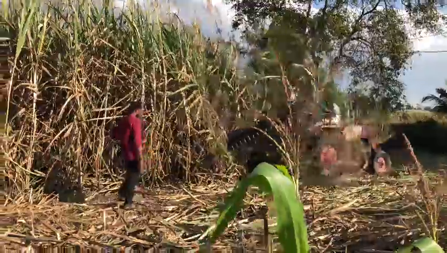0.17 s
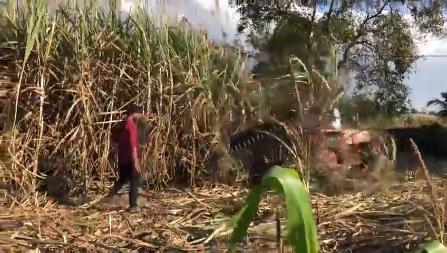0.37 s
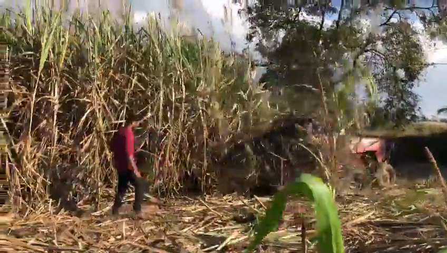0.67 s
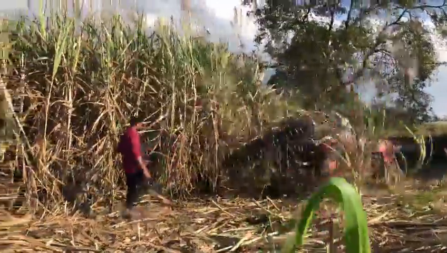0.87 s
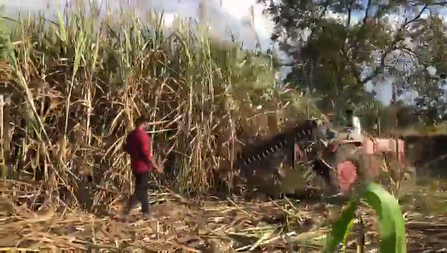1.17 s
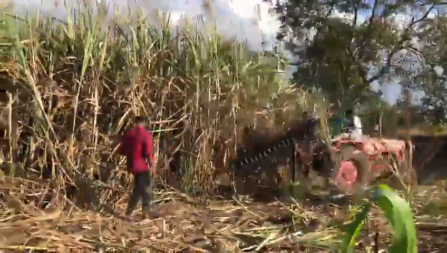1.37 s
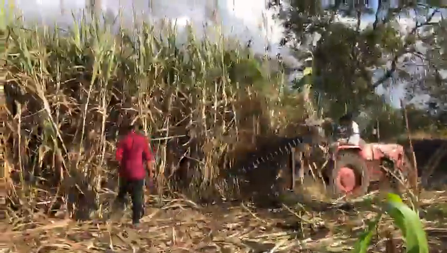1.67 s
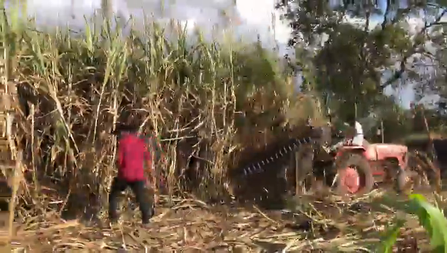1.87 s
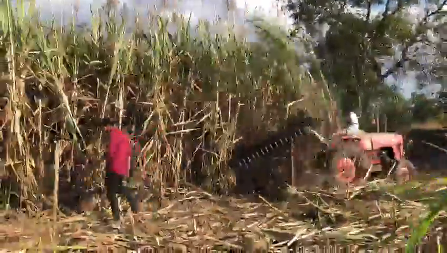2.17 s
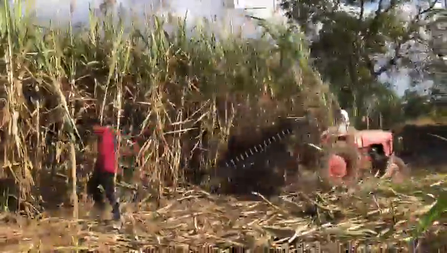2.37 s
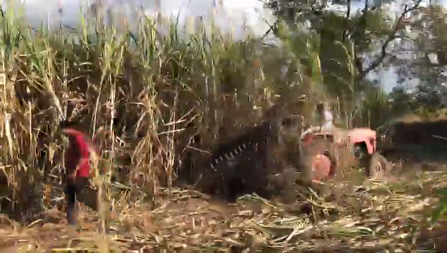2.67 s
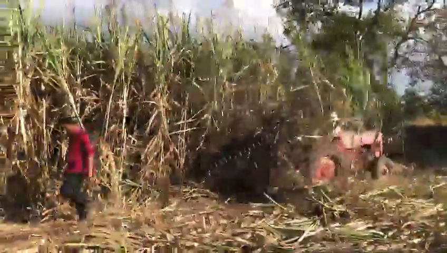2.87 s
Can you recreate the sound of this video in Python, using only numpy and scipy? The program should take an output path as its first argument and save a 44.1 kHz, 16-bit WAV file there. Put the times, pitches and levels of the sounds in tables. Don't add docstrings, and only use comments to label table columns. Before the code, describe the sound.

A diesel tractor and cane harvester roar steadily with fast metallic knocking and dry leaf rustle

```python
import sys
import numpy as np
from scipy import signal
from scipy.io import wavfile
from scipy.ndimage import uniform_filter1d

SR = 44100
rng = np.random.default_rng(int(sys.argv[2]) if len(sys.argv) > 2 else 0)


def persist_wave(psi):
    counts = np.round(np.clip(psi, -1, 1) * 32767).astype(np.int16)
    wavfile.write(sys.argv[1], SR, np.atleast_2d(counts).T)


def to_linear_factor(level_db):
    exponent = np.asarray(level_db, float) / 20
    return 10 ** exponent


N = 133623
T = np.arange(N) / SR


def rms_one(x):
    return x / np.sqrt(np.mean(x ** 2) + 1e-20)


def in_time(rows):
    s, *columns = np.transpose(rows)
    return [np.interp(T, s, column) for column in columns]


def drift(rate_hz):
    r = np.exp(-80 * np.pi * rate_hz / SR)
    slow = signal.lfilter([1], [1, -2 * r, r * r], rng.standard_normal(N // 40 + 2002))
    slow = slow[2000:]
    return np.interp(np.arange(N) / 40, np.arange(len(slow)), rms_one(slow - slow.mean()))


def resonance(x, hz, width_hz):
    r = np.exp(-np.pi * width_hz / SR)
    poles = [1, -2 * r * np.cos(2 * np.pi * hz / SR), r * r]
    return signal.lfilter([(1 - r * r) / 2, 0, (r * r - 1) / 2], poles, x + 1e-18)


def double_resonance(x, hz, width_hz, widening=2):
    return resonance(resonance(x, hz, width_hz), hz, width_hz * widening)


def band_pass(x, order, low_hz, high_hz):
    return signal.sosfilt(signal.butter(order, [low_hz, high_hz], "band", fs=SR, output="sos"), x)


def banded(sources, spectrum, first_hz, count, shared_db, own_db):
    out, together = 0, drift(6)
    edges_hz = first_hz * 2 ** (np.arange(count + 1) / 3)
    hz, db = np.transpose(spectrum)
    for k, (low_hz, high_hz) in enumerate(zip(edges_hz, edges_hz[1:])):
        band = band_pass(sources[k % 2], 2, low_hz, high_hz)
        level_db = np.interp(np.log(low_hz * high_hz) / 2, np.log(hz), db)
        out = out + to_linear_factor(level_db + shared_db * together + own_db * drift(27)) * band
    return rms_one(out)


def exhaust():
    orders = [
        (1, -30, .7),
        (1.5, -54, 3.0),
        (2, -30, 1.4),
        (2.5, -43, 3.0),
        (3, -46, 3.0),
        (3.5, -51, 3.0),
    ]
    firing_hz, wander_hz = 55.7, 0.067
    pipe_spread_cycles = 0.273
    puff_hz, puff_width_hz, puff_db, weak_puff_db = 270, 440, -50.5, 4.5

    cycles = np.cumsum(firing_hz + wander_hz * drift(8.7)) / SR
    hum = 0
    for order, level_db, wobble_db in orders:
        phase_cycles = order * cycles - pipe_spread_cycles * order * order
        gain = np.sqrt(2) * to_linear_factor(level_db + wobble_db * drift(11))
        hum = hum + gain * np.cos(2 * np.pi * phase_cycles)

    count = np.floor(cycles)
    fired = np.diff(count, prepend=0) * to_linear_factor(weak_puff_db * (count % 2) + 9.0 * drift(30))
    puff = double_resonance(fired, puff_hz, puff_width_hz)
    return hum + to_linear_factor(puff_db) * rms_one(puff)


def cutter():
    # time_s, lead over steady turning in blade passes, bite_db
    disc = [(.15, 0.11, -3), (.3, 0.081, -2), (.45, 0.12, -6.5), (.6, 0.07, 0), (.75, 0.15, -0.5),
            (.95, 0.11, -0.5), (1.15, 0.093, -2), (1.35, 0.033, -1), (1.6, 0.13, 0.5), (1.8, 0.18, -2.5),
            (1.95, 0.13, -0.5), (2.1, 0.31, 0.5), (2.25, 0.16, -1.5), (2.4, 0.29, -2.5), (2.55, .19, 0.5),
            (2.7, 0.15, -2.5), (2.85, 0.047, -1), (3.03, -0.11, -10)]
    # offset_ms, level_db
    contacts = [
        (-10, -13),
        (-6.5, -8),
        (-3.8, -5),
        (-2, 0),
        (.5, -8),
        (4, -11),
        (8, -11),
        (13, -14),
    ]
    # mode_hz, width_hz, level_db
    deck_modes = [(1062, 122, -5), (1297, 185, 4.5), (1530, 480, -3.5), (1960, 350, -13), (2526, 260, -4.5),
                  (3430, 1100, -10)]
    blade_hz, knock_db = 26.6, -22.5
    knock_spread_db, touch_spread_db, knock_jitter_ms = 1.3, 2.2, .8

    lead, bite_db = in_time(disc)
    at_s = np.interp(np.arange(3, 82), blade_hz * T + lead, T)
    pass_db = rng.standard_normal(len(at_s)) * knock_spread_db + np.interp(at_s, T, bite_db)

    offset_ms, contact_db = np.transpose(contacts)
    jitter_ms = knock_jitter_ms * rng.standard_normal((len(at_s), len(offset_ms)))
    hit_s = at_s[:, None] + (offset_ms + jitter_ms) / 1000
    touch_db = touch_spread_db * np.clip(rng.standard_normal(hit_s.shape), -2, 1)
    size_db = pass_db[:, None] + contact_db + touch_db

    out = 0
    for k, (mode_hz, width_hz, level_db) in enumerate(deck_modes):
        clicks = np.zeros(N + SR)
        mode_db = size_db + 0.65 * rng.standard_normal(hit_s.shape)
        np.add.at(clicks, (hit_s * SR).astype(int), to_linear_factor(mode_db) / width_hz)
        ring = double_resonance(clicks, mode_hz, width_hz, 2.9)[:N]
        out = out + (-1) ** k * to_linear_factor(level_db) * ring
    return to_linear_factor(knock_db) * rms_one(out)


def machinery():
    # spectrum_hz, level_db per Hz
    roar_spectrum = [(40, -9), (90, -6.5), (190, -10), (340, -17), (600, -6.5), (1200, -3), (2100, -6),
                     (4000, -19)]
    # ring_hz, width_hz, level_db
    housings = [(496, 64, -41), (595, 62, -37), (992, 90, -35), (2075, 34, -54), (2482, 83, -37)]
    roar_db = -20

    roar = banded(rng.standard_normal((2, N)), roar_spectrum, 31.4, count=22, shared_db=0.48, own_db=1.1)
    rings = 0
    for ring_hz, width_hz, level_db in housings:
        ring = resonance(resonance(rng.standard_normal(N), ring_hz, width_hz), ring_hz, width_hz)
        rings = rings + to_linear_factor(level_db + 3.9 * drift(34)) * rms_one(ring)
    return to_linear_factor(roar_db) * roar + rings


def leaves():
    # time_s, level_db
    thrash_curve = [(0.16, -26), (0.39, -24.5), (0.77, -25), (0.85, -22.5), (1.05, -24.5), (1.09, -20.5),
                    (1.19, -22.5), (1.76, -21.5), (1.93, -23.5), (2.36, -22.5), (2.39, -20), (2.46, -23.5),
                    (2.49, -21), (2.73, -22), (2.74, -19.5), (2.82, -22.5), (3.01, -21), (3.03, -22)]
    # spectrum_hz, level_db per Hz
    leaf_spectrum = [(2200, -9), (3300, -2), (5000, -4), (8000, -4.5), (10000, -7), (11500, -11.5),
                     (12500, -12)]
    crackle_per_s, crackle_db, swell_db = 3500, -2, .25

    level_db, = in_time(thrash_curve)
    sizes = to_linear_factor(2.4 * np.minimum(rng.exponential(1, (2, N)), 5)) * rng.choice([-1, 1], (2, N))
    born = rng.random((2, N)) < crackle_per_s * to_linear_factor(2.5 * drift(25)) / SR
    source = rng.standard_normal((2, N)) + to_linear_factor(crackle_db) * rms_one(sizes * born)
    rustle = banded(source, leaf_spectrum, 2040, count=8, shared_db=swell_db, own_db=0.98)
    return to_linear_factor(level_db + 1.5) * rustle


def stalks():
    # start_s, peak_db, pitch_hz, t60_s
    falls = [(.24, -18.5, 80.5, 0.073), (1.333, -19.5, 267, 0.042), (2.13, -22.5, 140, .08),
             (2.432, -26.5, 170, 0.077), (2.54, -21.5, 153, 0.084), (2.66, -22.5, 246, 0.041),
             (2.76, -18.5, 165, 0.065), (2.826, -13, 270, .04), (2.83, -18, 204, 0.048),
             (2.932, -15.5, 116, .08), (2.946, -15, 280, 0.032), (2.959, -14, 98, 0.097)]
    out = np.zeros(N)
    edge = rms_one(resonance(rng.standard_normal(N), 380, 350))
    for start_s, peak_db, pitch_hz, t60_s in falls:
        t = np.maximum(T - start_s, 0)
        push = 1 - np.exp(-t * pitch_hz * 4.6)
        ring = np.sin(2 * np.pi * pitch_hz * t) * 2 + 0.58 * edge
        out -= to_linear_factor(peak_db - 60 * t / t60_s) * push * ring
    return out


def snaps():
    # start_s, peak_db
    snap_events = [
        (0.834, -6.5),
        (2.738, -14),
    ]
    t60_s, low_hz, high_hz = 0.015, 3000, 10500
    shape = 0
    for start_s, peak_db in snap_events:
        decay_db = 60 * np.maximum(T - start_s, 0) / t60_s
        shape = shape + to_linear_factor(peak_db - 1 - decay_db) * (T >= start_s)
    return shape * band_pass(rng.standard_normal(N), 2, low_hz, high_hz)


def tumble():
    tumble_hz, width_hz, start_db, rise_db_per_s = 227, 298, -48.5, 4
    noise = double_resonance(rng.standard_normal(N), tumble_hz, width_hz)
    return to_linear_factor(start_db + rise_db_per_s * T + 3.8 * drift(10)) * rms_one(noise)


def flecks():
    # center_s, low_hz, high_hz, level_db
    patches = [
        (.952, 6340, 7550, -34.5),
        (1.138, 6500, 8750, -27),
        (1.254, 5600, 6900, -33),
        (2.717, 5630, 6900, -34),
        (2.717, 8300, 10000, -32),
    ]
    fleck_s = .046
    out = 0
    for center_s, low_hz, high_hz, level_db in patches:
        hiss = rms_one(band_pass(rng.standard_normal(N), 8, low_hz, high_hz))
        window = np.sin(np.pi * np.clip((T - center_s) / fleck_s + .5, 0, 1))
        out = out + to_linear_factor(level_db) * hiss * window
    return out


def scene():
    mid = cutter() + exhaust() + machinery() + leaves() + stalks() + snaps() + tumble()
    return mid + flecks() * np.array([[1], [-1]])


def mute_faint_treble(x):
    # band_hz, threshold_db re band mean
    thresholds = [(2500, -13), (5000, -8), (8000, -6.5), (10000, -5), (11300, -3.8), (11780, -1),
                  (12050, 7)]
    top_hz = 12040
    hz, _, z = signal.stft(x, SR, "cosine", nperseg=2048, noverlap=1024)
    power = uniform_filter1d(np.abs(z.mean(axis=0)) ** 2, size=4, axis=0)
    patch_db = 10 * np.log10(power / power.mean(axis=1, keepdims=True) + 1e-20)
    threshold_db = np.interp(hz, *np.transpose(thresholds), left=-200)
    over_db = patch_db - threshold_db[:, None]
    gate = np.clip(.5 + over_db / 2, .02, 1) * (hz < top_hz)[:, None]
    return signal.istft(z * gate, SR, "cosine", nperseg=2048, noverlap=1024)[1][:, :N]


def low_pass(x):
    return signal.sosfilt(signal.butter(12, 12240, fs=SR, output="sos"), x)


def record(dry):
    start_s = .148
    x = signal.sosfilt(signal.butter(2, 35, "high", fs=SR, output="sos"), dry)
    x = np.tanh(x / 1.1) * 1.1
    mix = mute_faint_treble(x) * (T >= start_s)
    return low_pass(mix)


dry = scene()
out = record(dry)
persist_wave(out)
```